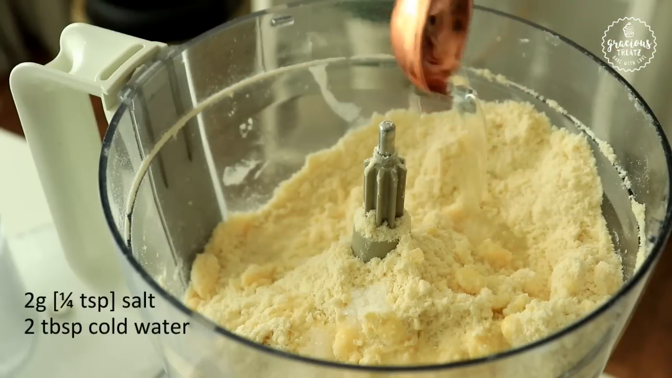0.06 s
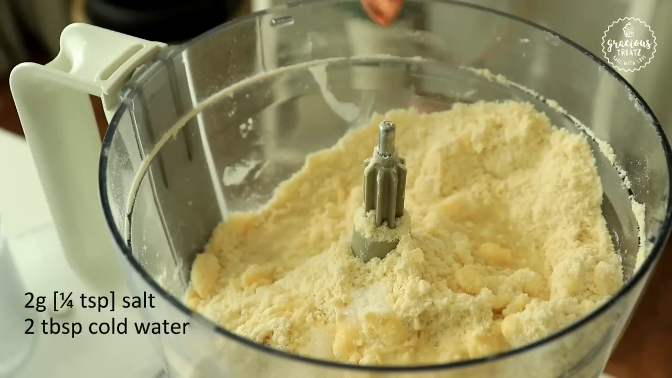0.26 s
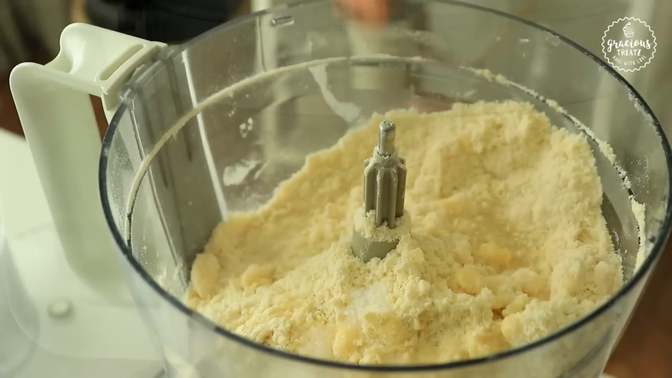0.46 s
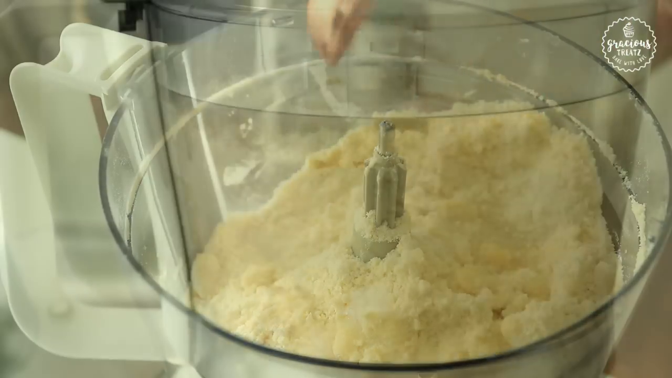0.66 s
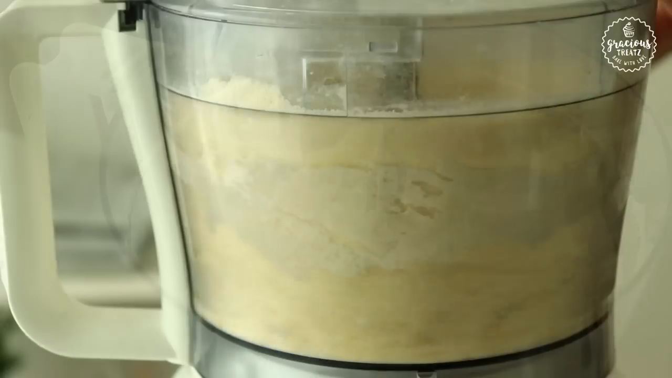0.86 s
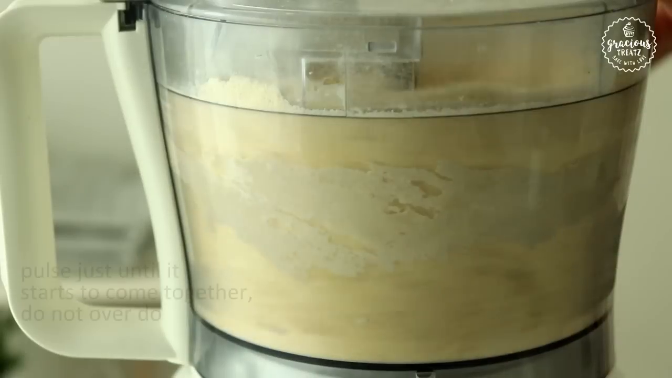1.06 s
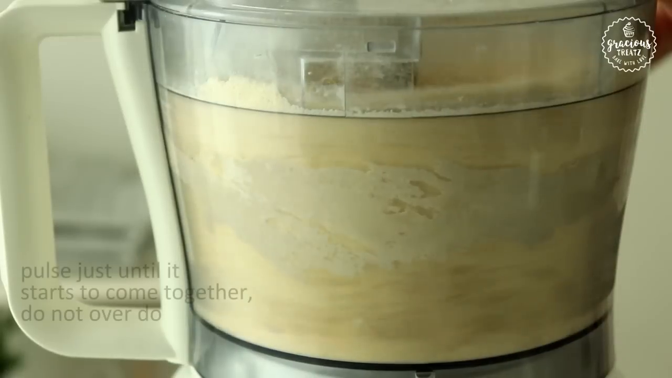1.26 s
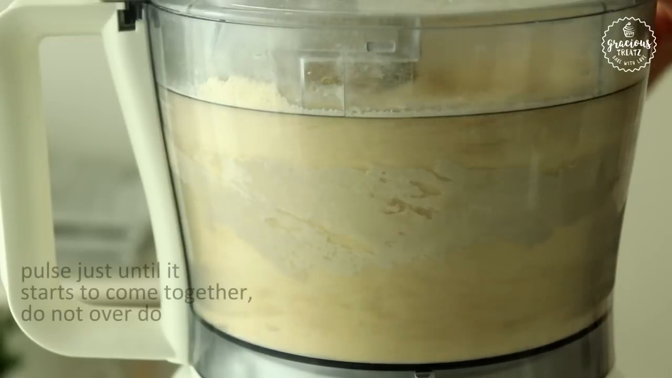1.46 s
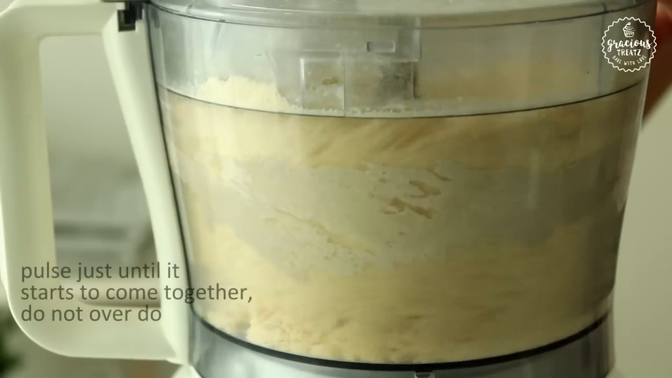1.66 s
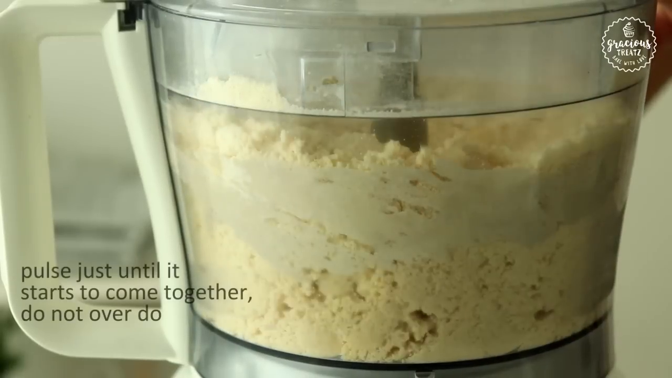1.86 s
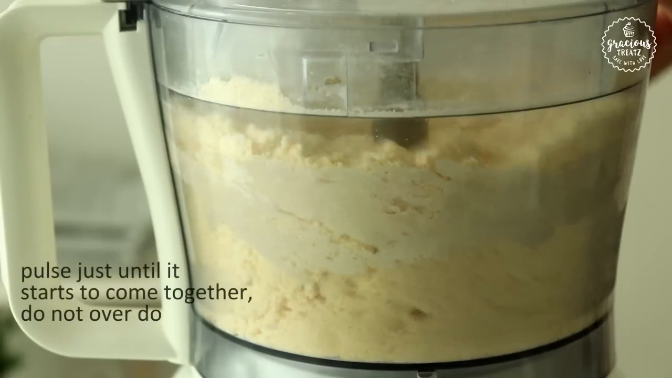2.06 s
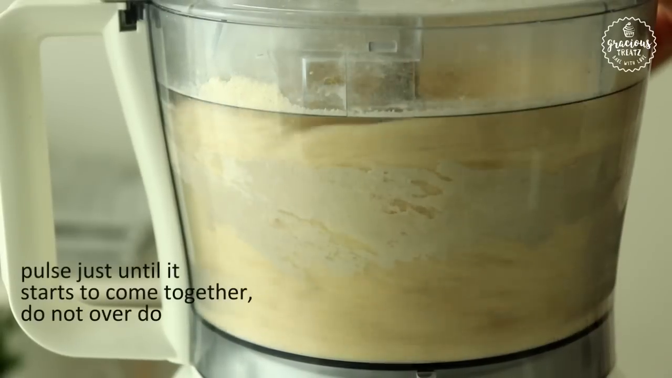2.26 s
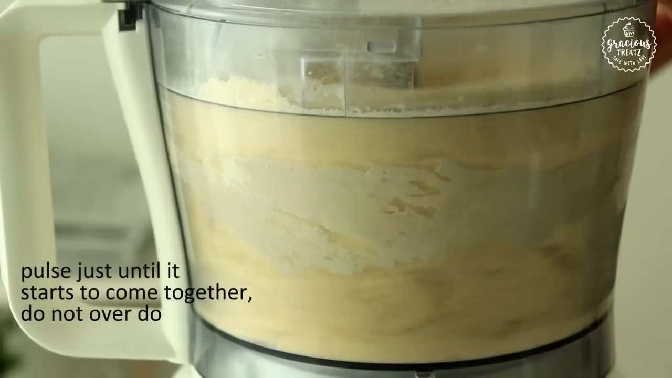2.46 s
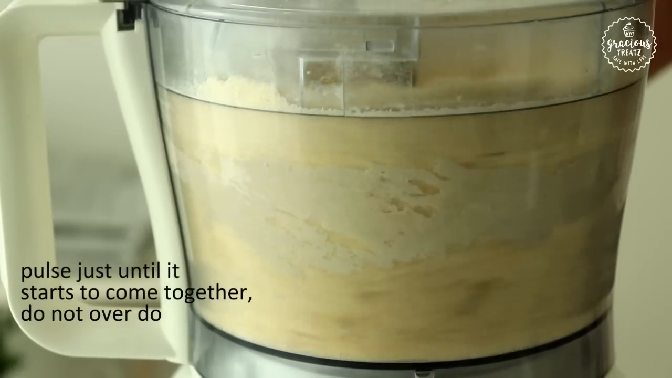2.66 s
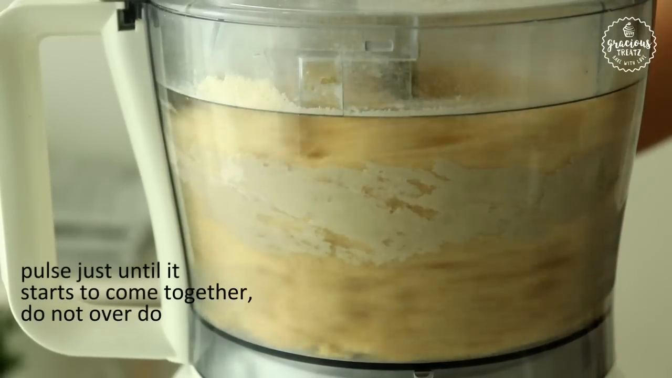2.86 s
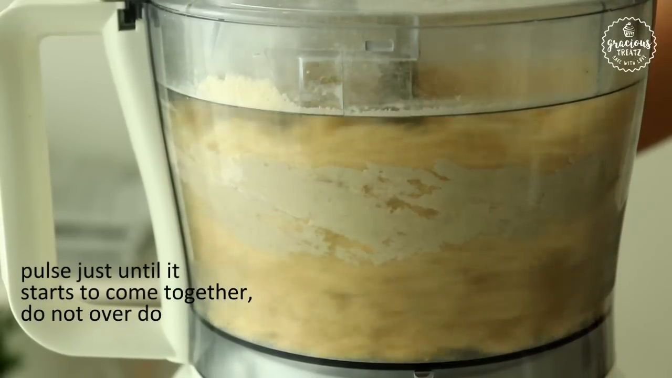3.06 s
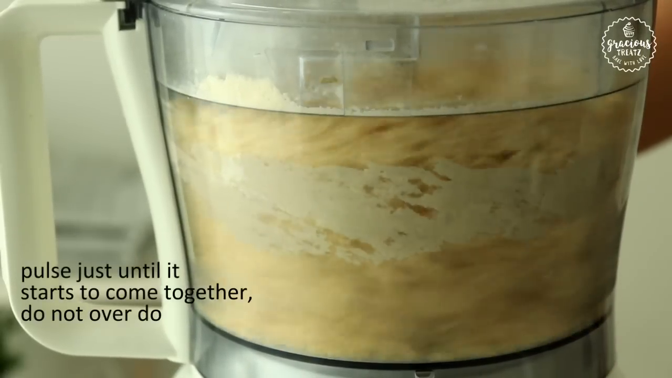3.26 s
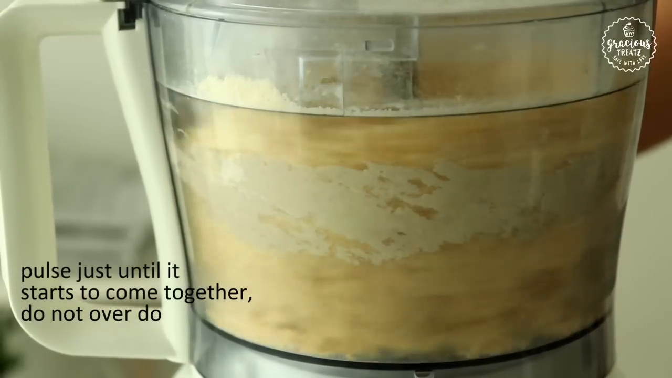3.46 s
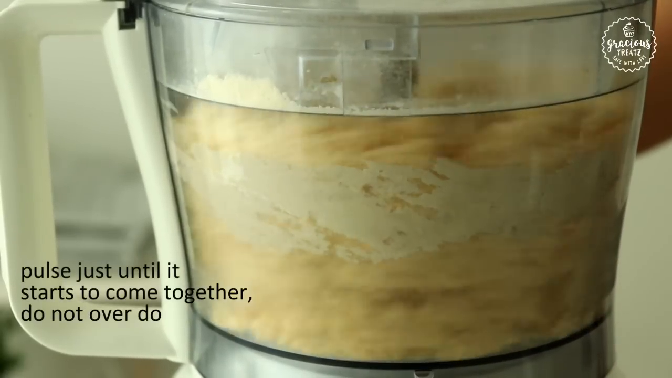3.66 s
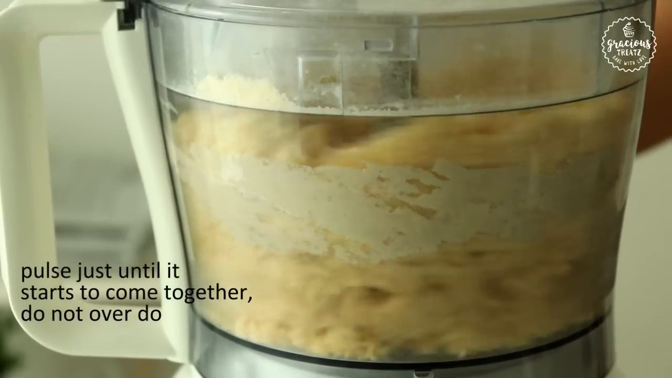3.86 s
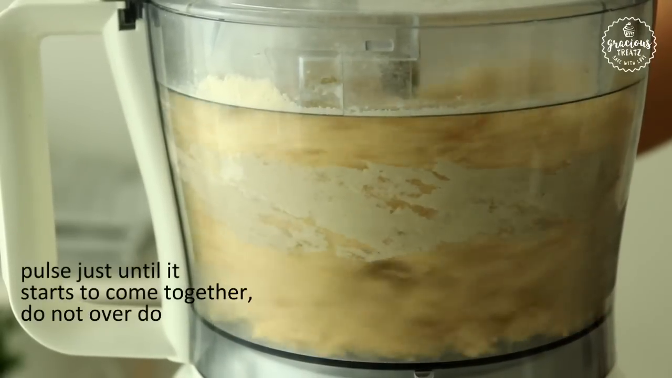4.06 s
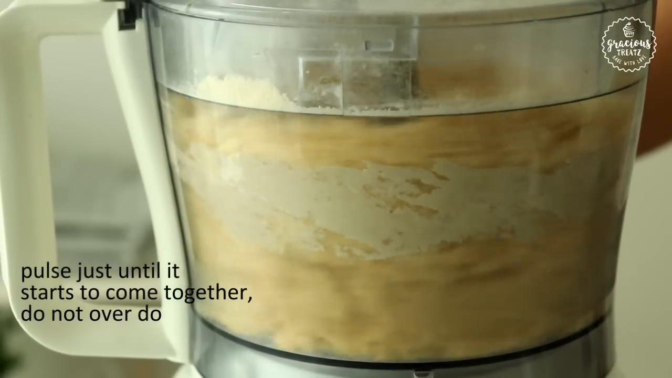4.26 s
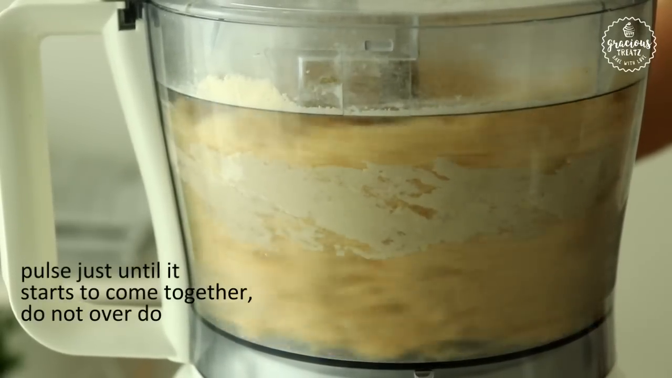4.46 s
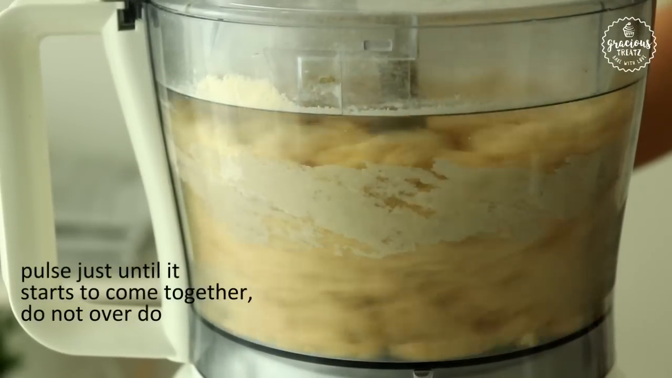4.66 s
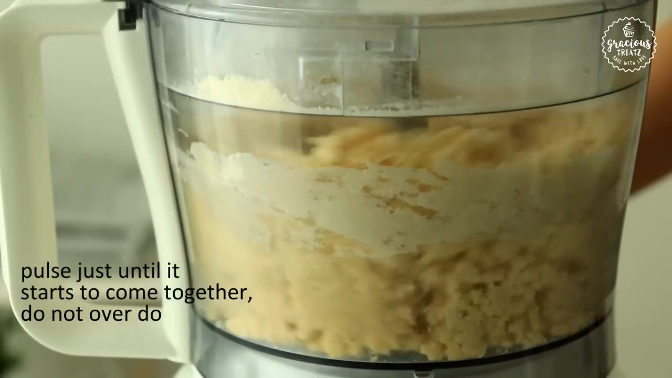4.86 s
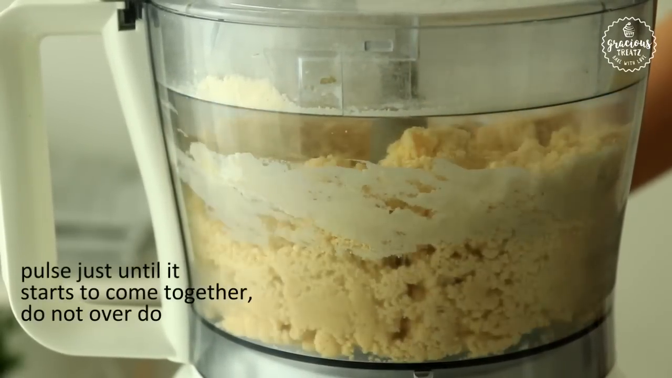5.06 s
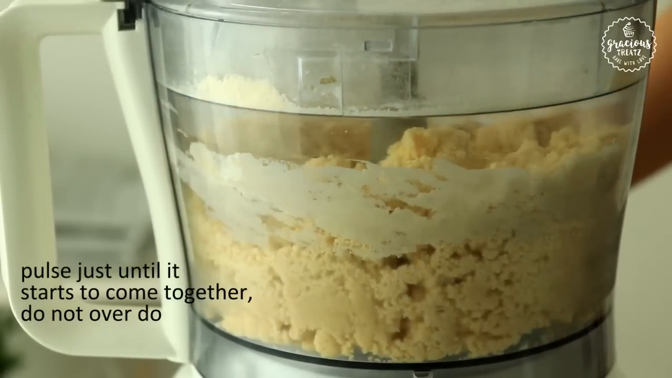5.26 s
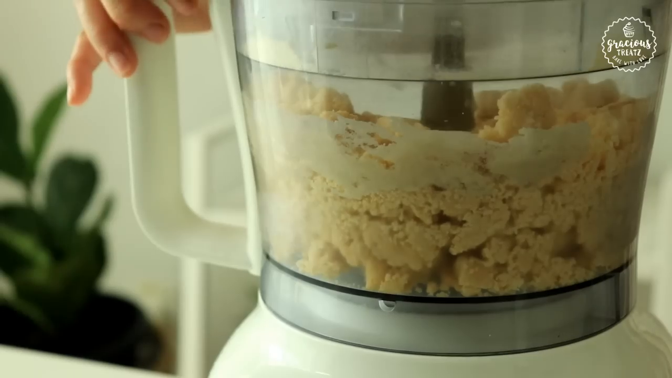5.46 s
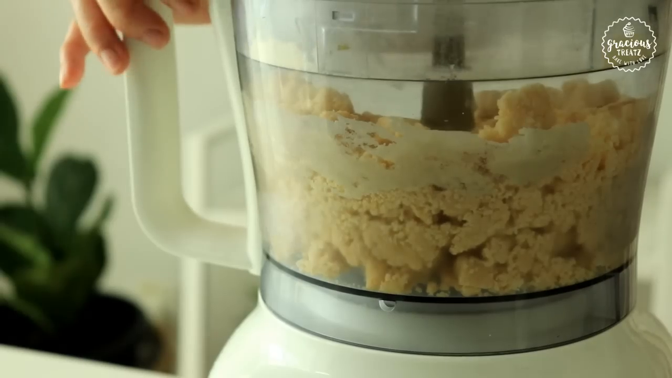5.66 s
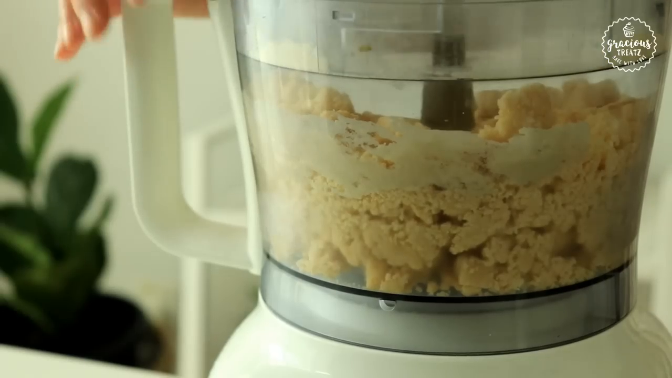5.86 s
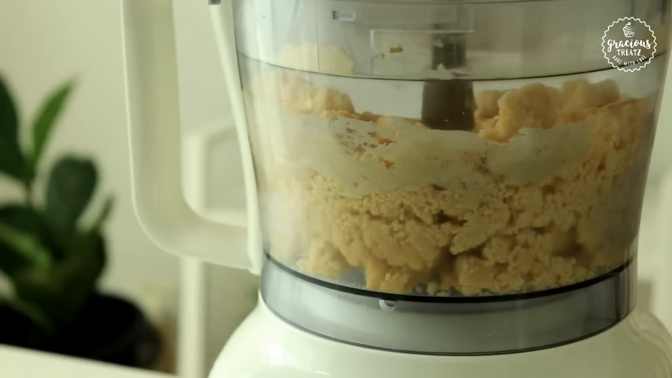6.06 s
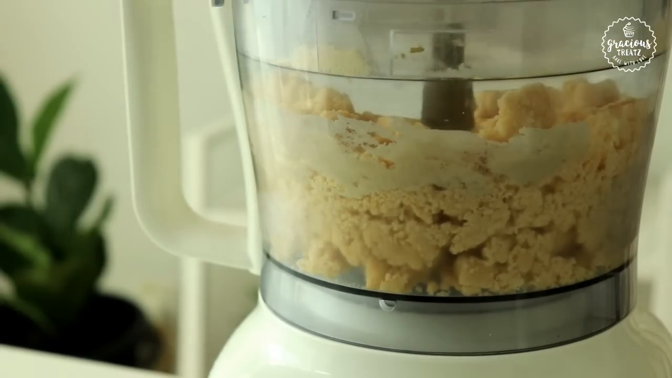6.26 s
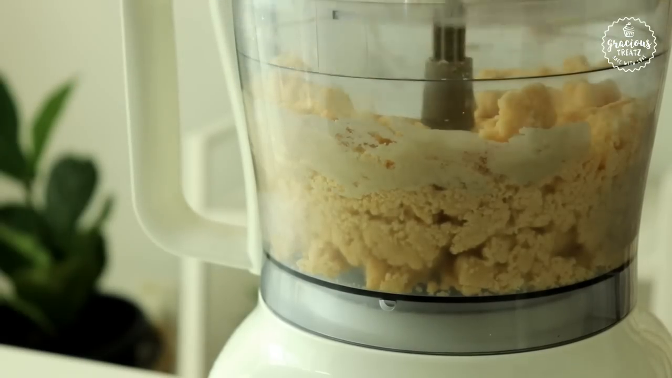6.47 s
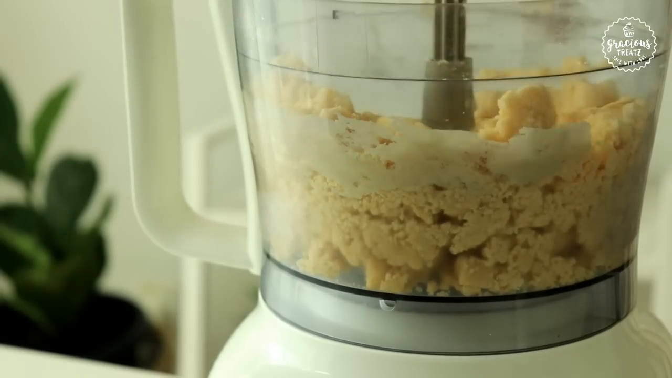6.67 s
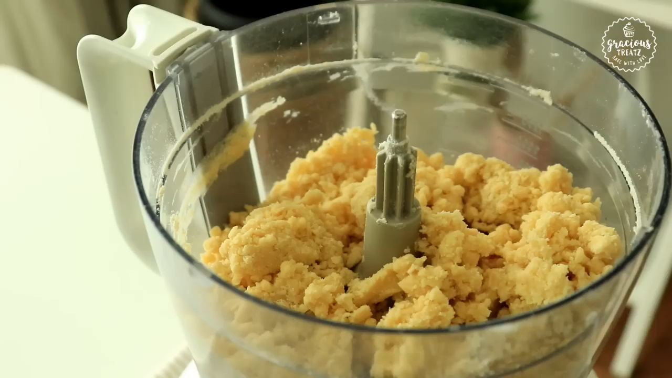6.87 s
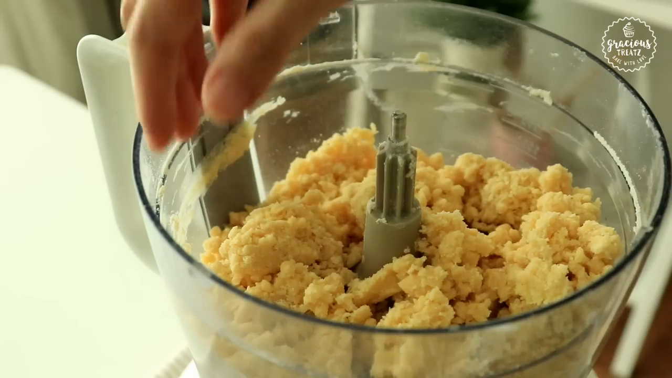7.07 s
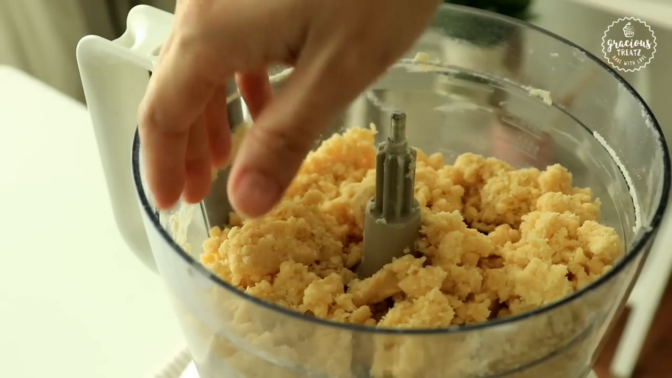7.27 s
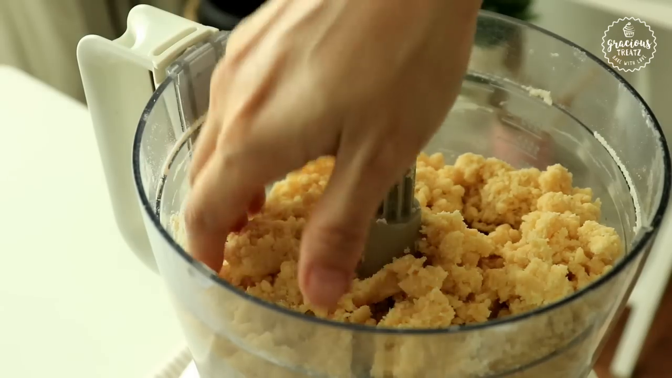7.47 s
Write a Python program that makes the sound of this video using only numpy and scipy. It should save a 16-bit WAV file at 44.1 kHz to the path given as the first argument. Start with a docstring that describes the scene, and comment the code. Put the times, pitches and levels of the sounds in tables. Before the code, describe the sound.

Two bursts of a food processor mixing dough spin up and wind down, then its plastic lid clicks free and the bowl is knocked.

```python
"""Dough in a food processor

In a small kitchen a motor runs twice: its fan whines up in harmonics, flour and butter churn, patter
and thud in the bowl, and friction brings it to rest. The lid twists free with a snap that drives a
limiter, and the plastic bowl bumps on its base. A hand taps the bowl and knocks the blade on its
spindle; each impact excites the damped normal modes of the part struck."""
import sys
import numpy as np
from scipy import signal
from scipy.fft import rfft, irfft, next_fast_len
from scipy.io import wavfile
from scipy.ndimage import uniform_filter1d

SR = 44100
rng = np.random.default_rng(int(sys.argv[2]) if len(sys.argv) > 2 else 0)


def unload_audio(sound):
    """Save the sound as a 16-bit wav file, at the path given as the first command line argument."""
    columns = np.transpose(np.atleast_2d(sound))
    # keep every value between -1 and 1, then stretch to whole-number steps
    steps = np.round(np.clip(columns, -1, 1) * 32767)
    wavfile.write(sys.argv[1], SR, steps.astype(np.int16))


N = 332073
TIME = np.arange(N) / SR

# Spectral shapes: f/Hz, relative level/dB
ROOM_HISS_SPECTRUM = [(35, -31), (60, -5), (305, -3.5), (413, -4.5), (889, -10), (953, -12.5), (1020, -9.5),
                      (1830, -12.5), (2910, -15), (15500, -20)]
CHANNEL_HISS_SPECTRUM = [(40, 20), (100, 12), (300, 11), (1000, 0.5), (4000, -3), (15000, 3.5)]
HOUSING_RESPONSE = [(41, -62), (70, -30), (179, -14.5), (416, -10.5), (562, -3.5), (617, -9.5), (744, -5.5),
                    (986, -11), (1940, -2), (2170, -5.5), (3100, -13), (3880, -13.5), (4680, -20),
                    (6200, -33.5), (8060, -57), (13600, -120)]
VENT_RESPONSE = [(500, -4), (1000, -0.5), (1700, -1), (2250, 1.5), (2900, 11.5), (3550, 9), (3950, 7),
                 (4400, 7)]
CRUMB_SPECTRUM = [(300, -38), (1500, -7), (4000, -5), (5500, -1.5), (7400, -10), (10200, -17), (12000, -13),
                  (15500, -24.5)]
LID_SPECTRUM = [(40, -50.5), (160, -26), (270, -15), (380, -12.5), (730, -10), (950, -0.5), (1400, 6.5),
                (2200, -4.5), (2900, -3), (4700, -9), (5550, -5), (7700, -9.5), (9000, -10), (11500, -15),
                (15500, -33)]
# Sustained sounds: start/s, end/s, level/dB
HISS_SPANS = [(0, .46, -64.5), (5.356, 6.42, -71.5), (6.755, 7.53, -65.5)]
DRONE_SPANS = [(0, .32, -74), (5.62, 6.72, -72)]
RUMBLE_SPANS = [(0, .6, -81), (6.752, 6.94, -56.5), (7.17, 7.53, -49.5), (7.3, 7.36, -48)]
RUB_SPANS = [(5.425, 5.6, -54.5), (5.87, 6.02, -69), (6.31, 6.5, -73)]
BRUSH_SPANS = [(7.275, 7.355, -63.5)]
# Switch presses: on/s, off/s, settling time of the dough/s, churn surge/dB, whine surge/dB
MOTOR_RUNS = [(0.695, 1.425, .35, -7, 3), (2.098, 4.64, 0.35, 3.5, 4.5)]
# Partials of the fan: multiple of its pitch, relative level/dB
FAN_ORDERS = [(.345, -0.5), (.91, -4), (1, 2.5), (2, -2), (3.003, -3), (4, -9), (5.002, -12.5)]
# Resonances of the shell and of the bowl's wall: f/Hz, width/Hz, relative level/dB
PANEL_RESONANCES = [(160, 120, -11.5), (803, 72, -8.5), (1204, 360, -5.5), (1634, 310, -8),
                    (3450, 400, -12)]
WALL_RESONANCES = [(6500, 160, -3), (8500, 570, -1.5), (9520, 280, 0.5), (12750, 270, -12)]
# Impacts: t/s, peak level/dB, low-pass corner/Hz (higher for a harder blow)
DRY_TICKS = [(.1995, -45.5, 7000), (.211, -44, 12000), (1.926, -53.5, 1226), (2.066, -45.5, 3600),
             (3.49, -50, 9000), (3.935, -51, 9000), (3.975, -50, 8960), (6.4745, -48.5, 5000),
             (6.503, -55, 5060), (6.756, -58, 1500)]
WORKTOP_JOLTS = [(.698, -61.5, 602.5), (2.102, -46.5, 601), (2.81, -65, 50.2), (5.469, -41.5, 680),
                 (6.754, -61, 150), (7.183, -51.5, 400), (7.32, -46, 298)]
BASE_BUMPS = [(5.414, -52.5, 3500), (5.438, -34.5, 2500), (5.602, -44, 900), (5.633, -42, 900),
              (5.663, -37, 507), (5.720, -52, 1193), (5.822, -41.5, 1204), (6.412, -54.5, 700),
              (6.478, -57, 299)]
BOWL_TAPS = [(7.132, -17, 3680), (7.1517, -33, 3800), (7.186, -49, 5000), (7.294, -36, 297),
             (7.3245, -42, 2000)]
HUB_KNOCKS = [(7.511, -16.5, 2750)]
# Normal modes of the struck parts: f/Hz, relative level/dB, T60/s
TICK_MODES = [(1830, -20, 0.035), (3400, -16, 0.013), (5800, 3.5, 0.005), (10000, -8, .006)]
WORKTOP_MODES = [(50.6, -10, 0.34), (103, -3.5, 0.15), (154, 4, 0.12), (194.7, 6.5, 0.15)]
BASE_MODES = [(180.4, -27, 0.16), (505, -16.5, 0.051), (755, 7.5, 0.026), (896, -5, .03),
              (1350, -10.5, 0.034)]
LID_MODES = [(745, -19, 0.074), (1254, -16.5, .03), (1710, -28, 0.03), (5500, -27.5, 0.16),
             (7120, -41, .03)]
BOWL_MODES = [(581, -10.5, 0.094), (644, -6.5, 0.063), (1330, -6.5, 0.048), (1350, -25, 0.052),
              (1800, -10.5, 0.045), (1970, 2.5, 0.015), (3180, 3.5, 0.014), (3980, 7.5, 0.013),
              (5170, 7, 0.013), (6700, -3, 0.038), (9500, 2, 0.043)]
HUB_MODES = [(240, -19, 0.073), (360, 9, 0.017), (505, 0.5, 0.027), (900, -28, 0.034), (990, -22, 0.21),
             (1840, -2.5, 0.027), (3550, 7.5, 0.012), (5300, 3, 0.021), (6350, 6.5, 0.018),
             (8030, 6, 0.019)]
# Cracks of the lid's latch: t/s, relative level/dB
LATCH_CRACKS = [(5.468, -13), (5.4689, -9.5), (5.4699, -4.5), (5.471, -10.5)]
# Reverberation time of the kitchen: f/Hz, T60/s
ROOM_DECAY = [(150, 1), (700, 0.43), (1500, 0.56), (6000, 0.55), (10000, 0.46), (15000, 0.28)]

START_HZ, FULL_HZ, BOUND_RISE_HZ = 620, 1915, 78  # fan pitch: at switch-on, in flour, rise in dough
SPIN_UP_S, SPIN_UP_SHAPE, COAST_S, COAST_SHAPE = .153, 1.15, .263, 1.4  # time constants and exponents
SURGE_S, BIND_AT_S, BIND_S = .17, 2.72, 0.097  # setting the heap moving; when and how fast it binds
# BOUND: the change once flour has bound into dough. FALL: the decay once the mixture lies still.
WHINE_DB, WHINE_BOUND_DB, WHINE_STALL_HZ = -44, -1.5, 533  # the whine fades below the stall pitch
CHURN_DB, CHURN_BOUND_DB, CHURN_FALL_DB_PER_S = -50, 1.5, 120.5
PATTER_DB, PATTER_BOUND_DB, PATTER_SURGE_DB, PATTER_FALL_DB_PER_S = -73, 3.5, 9, 179
FLOUR_DB, FLOUR_HZ, FLOUR_FALL_DB_PER_S = -85, 9000, 70
THUD_DB, THUDS_PER_S = -59.5, 90
# Turbulent share of a partial's power; partials dissolve into noise above ROUGH_HZ
ROUGH_BASE, ROUGH_DOUGH, ROUGH_PULL, ROUGH_COAST, ROUGH_HZ = .03, .19, .31, .06, 4400
COAST_OVERTONES_DB, COAST_TILT_DB_PER_OCTAVE, COAST_KNEE_HZ = 4, -7.5, 1900
KICK_LAG_S, KICK_DB, KICK_HZ = 0.01131, -41, 650  # each start jerks the bowl against its base


def amp(db):
    """Amplitude ratio of a level in decibels."""
    return 10 ** (np.asarray(db) / 20)


def unit(x):
    """Normalisation to an rms of 1."""
    return x / np.sqrt(np.mean(x ** 2) + 1e-20)


def read(points, hz):
    """Linear interpolation over log frequency."""
    f, value = np.transpose(points)
    return np.interp(np.log(hz + 1), np.log(f + 1), value)


def add(mix, s, sound):
    """Superposition of a sound on the mix, from time s."""
    part = mix[round(s * SR):][:len(sound)]
    part += sound[:len(part)]


def colour(x, gain):
    """Zero-phase filtering by gain(f/Hz)."""
    size = next_fast_len(len(x))
    return irfft(rfft(x, size) * gain(np.fft.rfftfreq(size, 1 / SR)), size)[:len(x)]


def drift(size, hz):
    """Random fluctuation of rms 1, low-passed at hz."""
    return unit(colour(rng.standard_normal(size), lambda f: 1 / (1 + (f / hz) ** 2)))


def grains(per_s, spread_db):
    """Shot noise: random impacts, most small and a few large."""
    size = amp(spread_db * np.minimum(rng.exponential(1, len(per_s)), 5))
    return unit(size * rng.choice([-1, 1], len(per_s)) * (rng.random(len(per_s)) < per_s / SR))


def held(spans, attack_s, fall_db_per_s):
    """Envelopes that rise, hold and decay exponentially, summed in power."""
    gains = [np.clip((TIME - start) / attack_s, 0, 1)
             * amp(db - fall_db_per_s * np.maximum(TIME - end, 0)) for start, end, db in spans]
    return np.linalg.norm(gains, axis=0)


def peaks(resonances, hz):
    """Summed gain of Lorentzian resonance curves."""
    return sum(amp(db) / (1 + (2 * (hz - f) / width) ** 2) for f, width, db in resonances)


def ring(modes, t):
    """Free vibration: a sum of damped normal modes."""
    return sum(amp(db - 60 * t / t60) * np.cos(2 * np.pi * hz * t) for hz, db, t60 in modes)


def strikes(impacts, modes, crack, crack_s, crack_hz, rise_s):
    """Impact excitation: modes ring with a burst of noise above crack_hz; soft contact cuts treble."""
    t, out = np.arange(SR // 3) / SR, np.zeros(N)
    for s, db, hard_hz in impacts:
        noise = colour(rng.standard_normal(len(t)), lambda f: f ** 2 / (f ** 2 + crack_hz ** 2))
        hit = (ring(modes, t) + crack * noise * np.exp(-t / crack_s)) * (1 - np.exp(-t / rise_s))
        pole = np.exp(-2 * np.pi * hard_hz / SR)
        hit = signal.lfilter([1], [1, -2 * pole, pole * pole], hit)
        add(out, s, amp(db) * hit / np.max(abs(hit)))
    return out


def background(floor_db=-85.5, drone_hz=45):
    """Ambient noise: room hiss, uncorrelated hiss per channel, handling rumble, an appliance's drone."""
    hiss = unit(colour(rng.standard_normal(N), lambda f: amp(read(ROOM_HISS_SPECTRUM, f))))
    channel_hiss = np.array([unit(colour(noise, lambda f: amp(read(CHANNEL_HISS_SPECTRUM, f))))
                             for noise in rng.standard_normal((2, N))])
    hiss_gain = np.hypot(amp(floor_db), held(HISS_SPANS, attack_s=0.001, fall_db_per_s=21))
    rumble = unit(colour(rng.standard_normal(N), lambda f: 1 / (1 + ((f - 20) / 8) ** 2)))
    rumble *= held(RUMBLE_SPANS, attack_s=0.005, fall_db_per_s=110)
    drone = np.sqrt(2) * np.sin(2 * np.pi * drone_hz * TIME)
    drone *= held(DRONE_SPANS, attack_s=.04, fall_db_per_s=47)
    return hiss_gain * (hiss + amp(-12.5) * channel_hiss) + rumble + drone


def ticks():
    """Heavily damped modes give dry ticks; the faint one at 6.756 s marks the hiss stepping up."""
    return strikes(DRY_TICKS, TICK_MODES, crack=1.8, crack_s=0.0019, crack_hz=590, rise_s=.0001)


def binding(t):
    """Logistic transition of the mixture from loose flour (0) to dough (1)."""
    return 1 / (1 + np.exp((BIND_AT_S - t) / BIND_S))


def fan_pitch(t, on, off):
    """Rotor inertia: the pitch climbs gradually under drive, then falls through friction."""
    shortfall_hz = (FULL_HZ - START_HZ) * np.exp(-((t - on) / SPIN_UP_S) ** SPIN_UP_SHAPE)
    driven_hz = FULL_HZ + BOUND_RISE_HZ * binding(t) - shortfall_hz
    return driven_hz * np.exp(-(np.maximum(t - off, 0) / COAST_S) ** COAST_SHAPE)


def housing(hz):
    """Frequency response of the shell: a broad curve with panel resonances."""
    return amp(read(HOUSING_RESPONSE, hz)) * (0.46 + peaks(PANEL_RESONANCES, hz))


def whine(hz, bound):
    """Fan tones broadened by turbulence, the more so the higher they lie and the harder the pull."""
    size, out = len(hz), 0
    climb = np.gradient(hz) * SR / 3000  # 1 at a rise of 3000 Hz/s
    pull, coast = np.clip(climb, 0, 1), np.clip(-climb, 0, 1)
    cycles = np.cumsum(hz * (1 + .004 * drift(size, 14) + .005 * drift(size, 150))) / SR
    for order, db in FAN_ORDERS:
        partial_hz = order * hz
        strain = (ROUGH_PULL * pull + ROUGH_COAST * coast) * order ** 1.5
        rough = np.minimum(ROUGH_BASE + ROUGH_DOUGH * bound + (partial_hz / ROUGH_HZ) ** 2 + strain, .97)
        skirt = (drift(size, 130) + 1j * drift(size, 130)) / np.sqrt(2)
        fading = unit(amp((2.5 + 1.8 * (order > 1)) * np.clip(drift(size, 28), -2, 1.5)))
        flutter = fading * (np.sqrt(1 - rough) + np.sqrt(rough) * skirt)
        tone = (flutter * np.exp(2j * np.pi * order * cycles)).real
        # overtones weaken during spin-up; the lower ones sing out during coasting
        pull_db = -4 * pull * np.sqrt(max(order - 1, 0))
        octaves = np.log2(np.maximum(partial_hz / COAST_KNEE_HZ, 1))
        coast_db = coast * (order > 1) * (COAST_OVERTONES_DB + COAST_TILT_DB_PER_OCTAVE * octaves)
        out += amp(db + pull_db + coast_db + read(VENT_RESPONSE, partial_hz)) * housing(partial_hz) * tone
    return out


def churn(pace):
    """Air rush and lumps on the blade, modulated by tumbling dough; a slow blade sounds duller."""
    rush = unit(rng.standard_normal(len(pace)) + 0.46 * grains(100 + 900 * pace, spread_db=4.5))
    tumbling = amp(1.22 * drift(len(pace), 45))
    bright = unit(colour(rush * tumbling, housing))
    dull = colour(bright, lambda f: 1 / np.hypot(1, (f / 2800) ** 2))
    return dull + np.sqrt(pace) * (bright - dull)


def patter(pace):
    """Shot noise of flying crumbs, filtered by the resonances of the bowl's wall."""
    crumbs = grains(100 + 1300 * pace, spread_db=3.0) + 1.2 * rng.standard_normal(len(pace))
    return unit(colour(crumbs, lambda f: amp(read(CRUMB_SPECTRUM, f))
                       * (0.73 + peaks(WALL_RESONANCES, f))))


def flour_hiss(size):
    """Friction noise of dry flour sweeping the wall."""
    return unit(colour(rng.standard_normal(size), lambda f: f ** 2 / (f ** 2 + FLOUR_HZ ** 2)))


def base_response(force):
    """Forced vibration of the base: convolution with its impulse response, scaled to rms 1."""
    return unit(signal.fftconvolve(force, ring(BASE_MODES, np.arange(SR // 6) / SR))[:len(force)])


def thuds(pace):
    """Soft impacts: clumps of dough drive the base with little treble."""
    clumps = grains(THUDS_PER_S * pace, spread_db=2)
    return base_response(colour(clumps, lambda f: 1 / (1 + (f / 1500) ** 4)))


def motor(on, off, settle_s, churn_surge_db, whine_surge_db):
    """Superposition of fan and mixture over one run; levels follow surge, binding and settling."""
    age = np.arange(0, off - on + .75, 1 / SR)
    t = on + age
    hz = fan_pitch(t, on, off)
    pace = hz / np.max(hz)
    surge = np.exp(-(age / SURGE_S) ** 2)
    bound = pace * binding(t)
    still_s = np.maximum(t - off - settle_s, 0)
    churn_db = CHURN_DB + churn_surge_db * surge + CHURN_BOUND_DB * bound - CHURN_FALL_DB_PER_S * still_s
    patter_db = PATTER_DB + PATTER_BOUND_DB * bound - PATTER_FALL_DB_PER_S * still_s
    patter_db += PATTER_SURGE_DB * surge * (1 - pace)
    whine_db = WHINE_DB + whine_surge_db * surge + WHINE_BOUND_DB * bound
    sound = amp(churn_db) * churn(pace) + amp(patter_db) * patter(pace)
    sound += amp(THUD_DB) * bound * thuds(pace)
    sound += amp(FLOUR_DB - FLOUR_FALL_DB_PER_S * still_s) * (1 - binding(t)) * flour_hiss(len(t))
    sound += amp(whine_db) * whine(hz, bound) / np.hypot(1, (WHINE_STALL_HZ / hz) ** 3)
    return sound * np.minimum(age / 0.0064, 1)


def jolts():
    """Structure-borne sound: dull blows excite the low modes of the worktop."""
    return strikes(WORKTOP_JOLTS, WORKTOP_MODES, crack=14.0, crack_s=0.047, crack_hz=350, rise_s=0.0021)


def bumps():
    """Impacts of the bowl excite the modes of its base, at each motor start and under the hand."""
    kicks = [(on + KICK_LAG_S, KICK_DB, KICK_HZ) for on, *_ in MOTOR_RUNS]
    return strikes(kicks + BASE_BUMPS, BASE_MODES, crack=0.8, crack_s=0.012, crack_hz=900, rise_s=0.0047)


def scrape(slips):
    """Dry friction: small slips filtered by the spectra of plastic and crumbs in cascade."""
    return unit(colour(slips, lambda f: amp(read(LID_SPECTRUM, f) + read(CRUMB_SPECTRUM, f))))


def rub():
    """Stick-slip friction of the bowl on its base rings the base, with a faint scrape."""
    slips = grains(np.full(N, 500.), spread_db=1.0)
    friction = base_response(slips) + amp(-10.0) * scrape(slips)
    return held(RUB_SPANS, attack_s=0.01, fall_db_per_s=97) * friction


def latch():
    """Broadband excitation: the lugs crack past their catch, and the lid's modes ring on."""
    t = np.arange(SR // 8) / SR
    start, burst, out = LATCH_CRACKS[0][0], np.zeros(len(t)), np.zeros(N)
    for s, db in LATCH_CRACKS:
        add(burst, s - start, amp(db) * rng.standard_normal(len(t)) * np.exp(-t / 0.0031))
    flat_spectrum = np.exp(1j * np.angle(rfft(burst)))
    lid_gain = amp(read(LID_SPECTRUM, np.fft.rfftfreq(len(t), 1 / SR)))
    snap = irfft(flat_spectrum * lid_gain, len(t)) * np.exp(-t / 0.01)
    add(out, start, amp(-28.5) * unit(snap) + amp(-9.0) * ring(LID_MODES, t))
    return out


def taps():
    """Taps of a hand set the open bowl into free vibration."""
    return strikes(BOWL_TAPS, BOWL_MODES, crack=4.2, crack_s=0.0036, crack_hz=870, rise_s=0.0009)


def brush():
    """Granular friction: fingers brush dry crumbs against the plastic."""
    rustle = scrape(grains(np.full(N, 1500.), spread_db=4.5))
    return held(BRUSH_SPANS, attack_s=0.0073, fall_db_per_s=216) * rustle


def knock():
    """Impact on the spindle excites the modes of the blade's hub."""
    return strikes(HUB_KNOCKS, HUB_MODES, crack=0.87, crack_s=0.0036, crack_hz=400, rise_s=0.0026)


def kitchen(x):
    """Reverberation: dense reflections, strongest from near walls, each band decaying at its own rate."""
    reflections = rng.standard_normal(SR) * (rng.random(SR) < 5000 / SR)
    hz, t, bands = signal.stft(reflections, SR, nperseg=256)
    decay = amp(-60 * t / read(ROOM_DECAY, hz)[:, None])
    tail = signal.istft(bands * decay, SR, nperseg=256)[1]
    age = np.arange(len(tail)) / SR
    tail *= np.clip(age / 0.0059 - .5, 0, 1) * (1 + 0.46 * np.exp(-age / 0.043))
    return signal.fftconvolve(x, tail / np.linalg.norm(tail))[:N]


def scene():
    """Direct sound plus reverberant field; the latch sends the largest share into the room."""
    machine = np.zeros(N)
    for on, *settings in MOTOR_RUNS:
        add(machine, on, motor(on, *settings))
    snap = latch()
    base = bumps() + rub()
    handling = taps() + knock() + ticks() + jolts() + brush()
    room = kitchen(amp(-13) * machine + amp(-6.5) * snap + amp(-11) * base + amp(-7.5) * handling)
    return machine + snap + base + handling + room + background()


def record(dry, ceiling_db=-15, release_db_per_s=90, edge_hz=15800):
    """Peak limiting: the gain ducks at the snap and recovers over its echo; a low-pass follows."""
    peak_db = 20 * np.log10(abs(dry).max(0) + 1e-9)
    release_db = TIME * release_db_per_s
    envelope_db = np.maximum.accumulate(peak_db + release_db) - release_db
    over_db = np.maximum(envelope_db - ceiling_db, 0)
    limited = dry / amp(uniform_filter1d(over_db, size=12))
    low_pass = signal.firwin(511, edge_hz, window=("kaiser", 9), fs=SR)
    return signal.oaconvolve(limited, low_pass[None], "same")


dry = scene()
out = record(dry)
unload_audio(out)
```